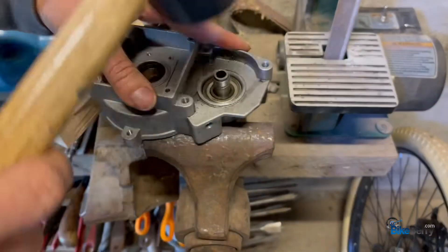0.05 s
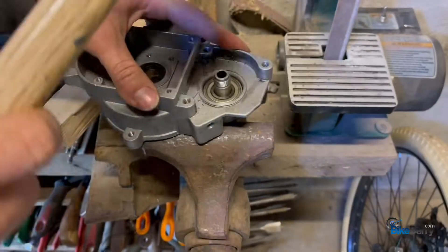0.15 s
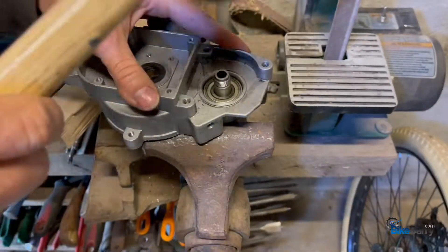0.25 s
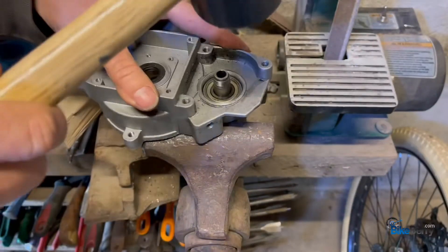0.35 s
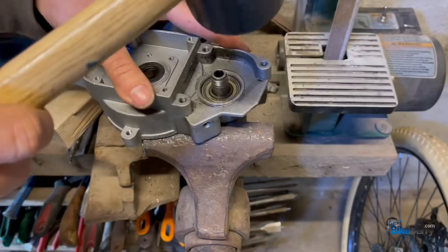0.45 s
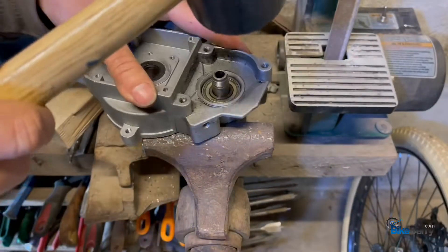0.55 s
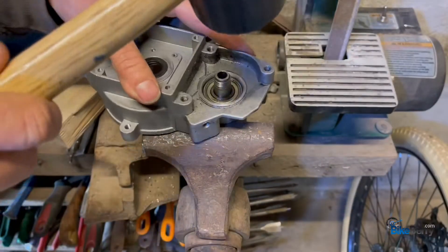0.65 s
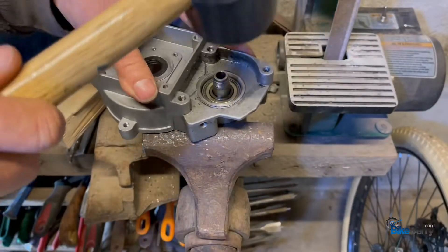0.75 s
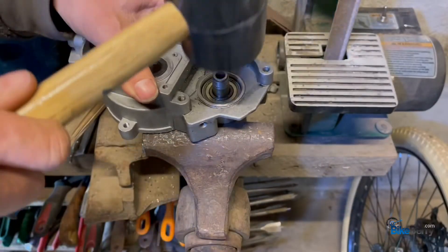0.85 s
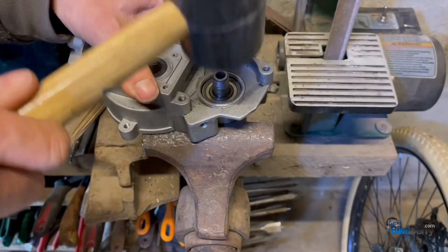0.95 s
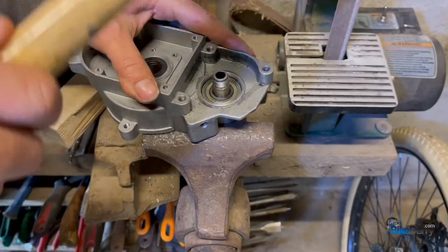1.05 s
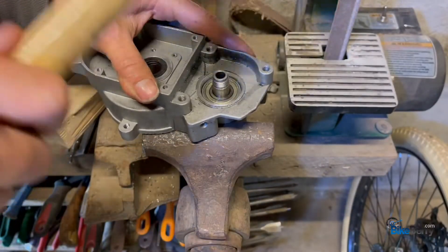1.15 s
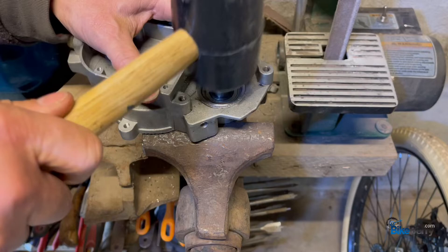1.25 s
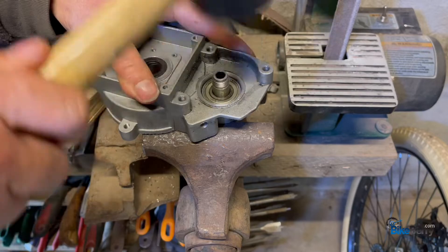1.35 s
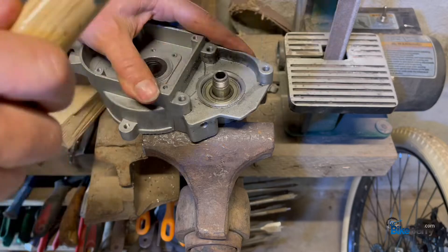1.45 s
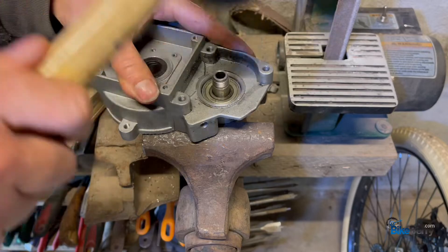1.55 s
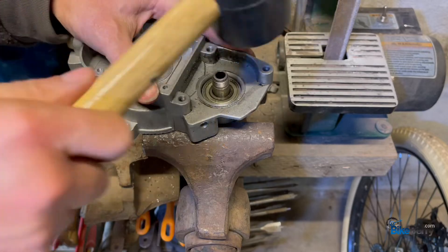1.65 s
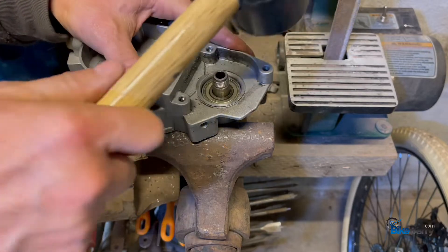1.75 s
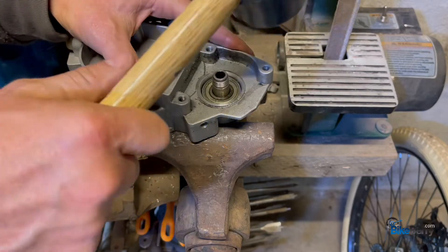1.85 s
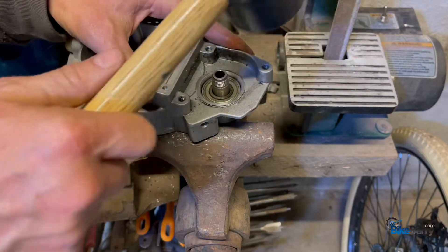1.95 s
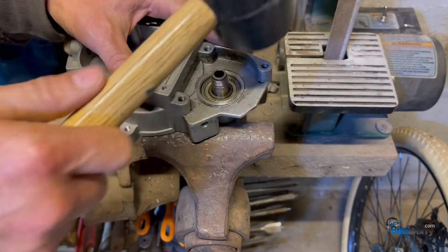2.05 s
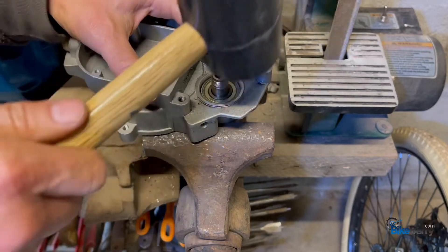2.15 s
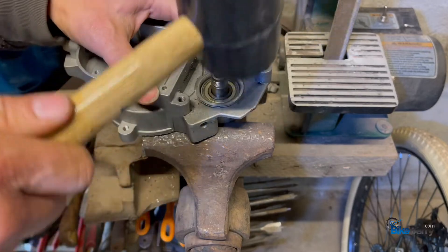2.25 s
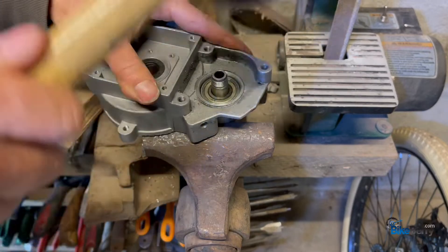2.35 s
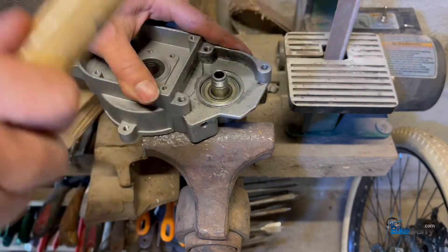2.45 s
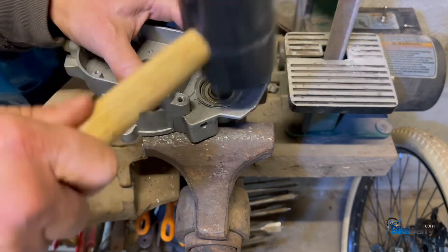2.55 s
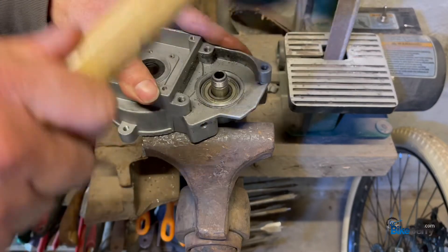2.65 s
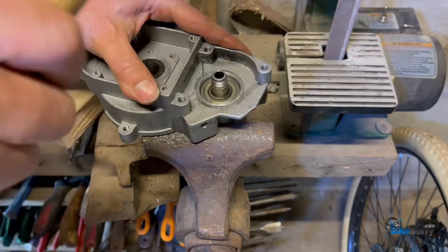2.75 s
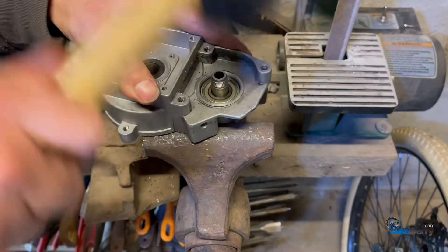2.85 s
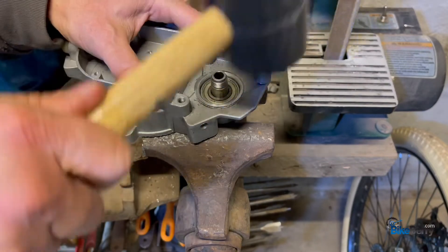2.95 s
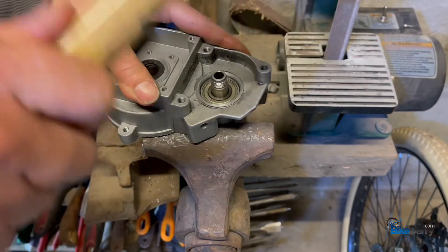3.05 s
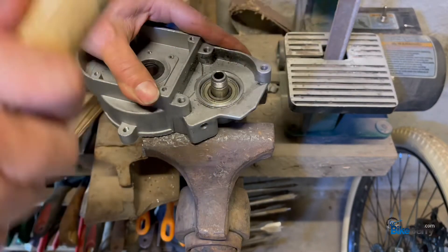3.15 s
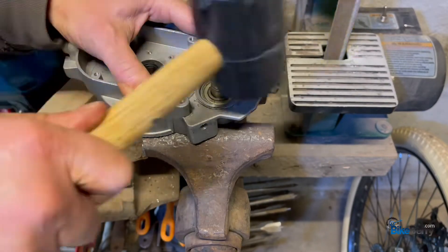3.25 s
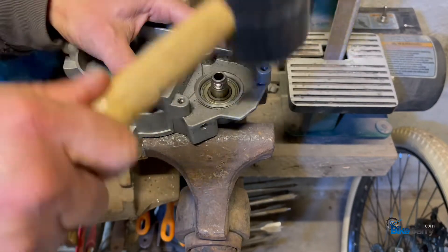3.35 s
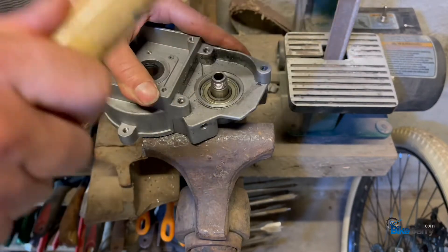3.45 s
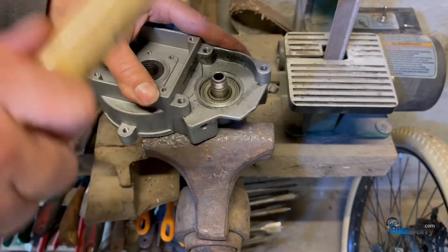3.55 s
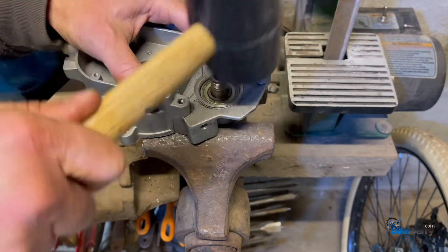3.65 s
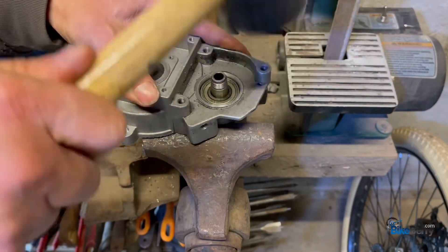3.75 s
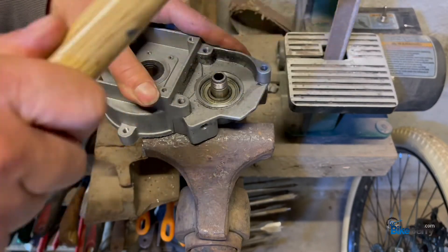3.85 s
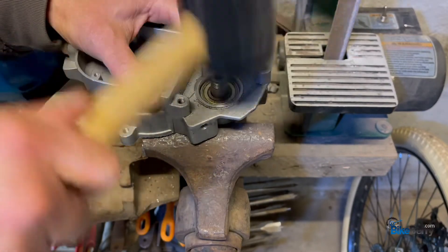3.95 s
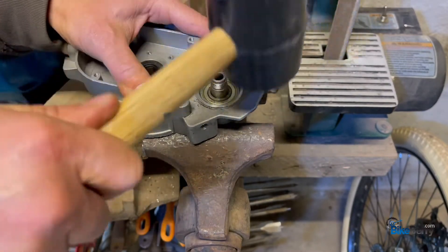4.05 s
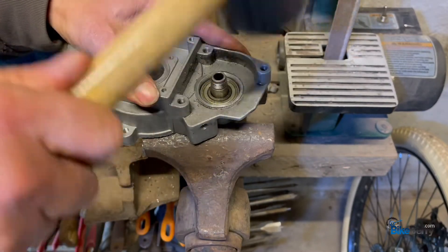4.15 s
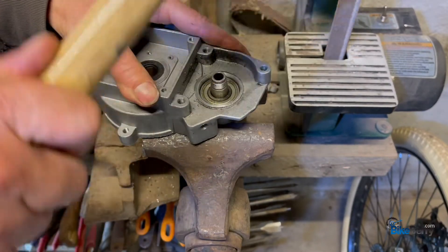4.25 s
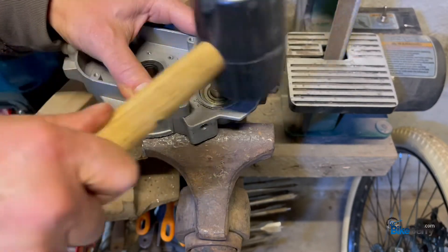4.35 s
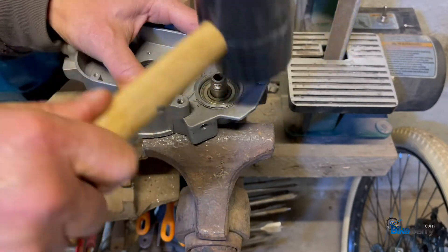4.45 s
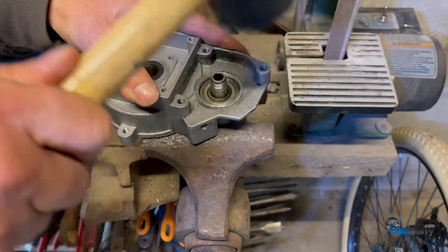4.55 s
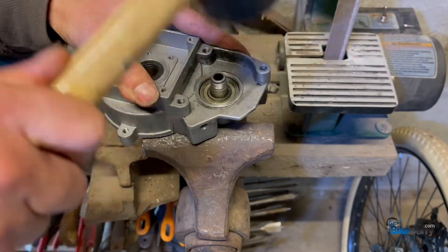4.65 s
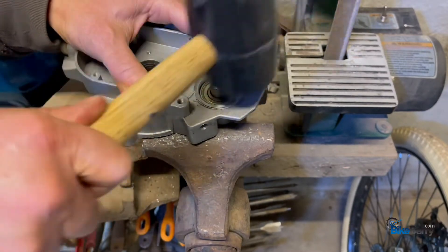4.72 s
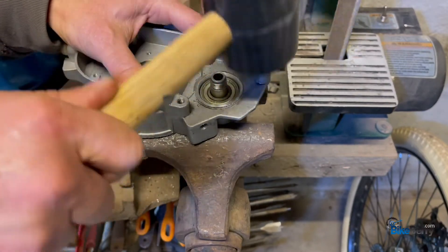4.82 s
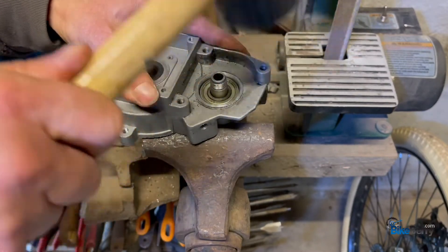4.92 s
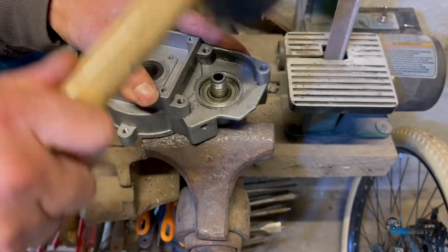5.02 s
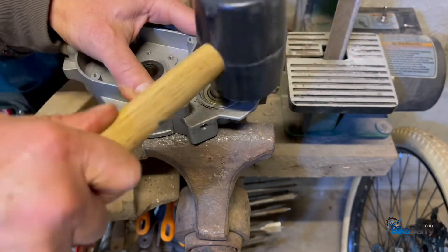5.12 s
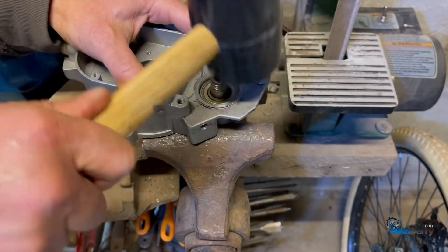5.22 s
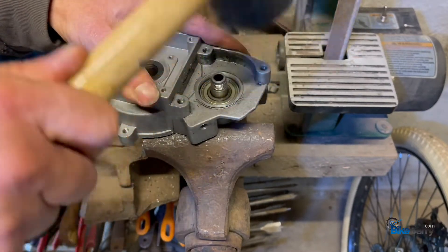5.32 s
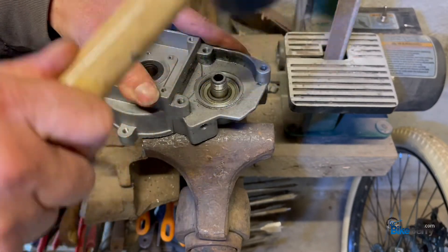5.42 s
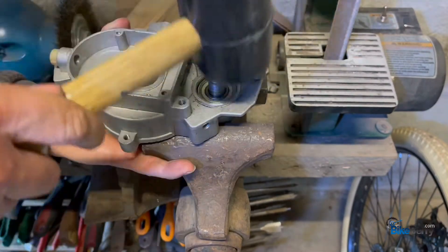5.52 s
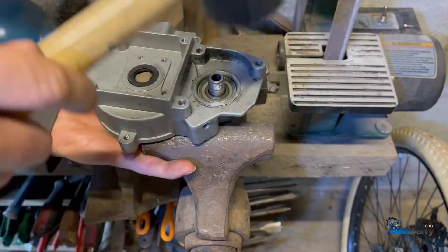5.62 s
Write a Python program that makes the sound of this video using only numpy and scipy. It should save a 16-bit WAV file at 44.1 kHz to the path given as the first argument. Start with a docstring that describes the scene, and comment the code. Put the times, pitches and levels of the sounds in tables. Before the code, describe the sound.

A rubber mallet strikes a metal engine case in a vise: handling scrape, one ringing blow, a pause, then eight quick heavy clanking knocks.

```python
"""A rubber mallet knocks a steel shaft in an aluminium engine case on a vise: one light blow, then a quick run.
Each blow sums decaying modes of case, shaft, bench and frame with a noisy crack, gritty clatter and room echo.
Light taps and a short rocking of the case use the same mechanism with other settings.
The case scrapes over the vise as smooth coloured noise; skin and cloth rustle in grainy swells.
Behind it lies the workshop: unsteady low hum tones and coloured noise for the air."""
import sys
import numpy as np
from scipy import signal
from scipy.fft import rfft, irfft, next_fast_len
from scipy.io import wavfile
from scipy.ndimage import uniform_filter1d, map_coordinates

SR = 44100
rng = np.random.default_rng(int(sys.argv[2]) if len(sys.argv) > 2 else 0)


def output_pcm(signal):
    """Save a mono or channel-first signal as 16-bit PCM at the path in sys.argv[1].

    Samples are clipped to [-1, 1] before scaling.
    """
    pcm = np.clip(np.atleast_2d(signal).T, -1, 1) * 32767
    wavfile.write(sys.argv[1], SR, np.round(pcm).astype(np.int16))


def boost(x):
    """Linear amplitude factor 10**(x/20) for a level x in decibels (scalar or array-like)."""
    u = np.asarray(x, float) / 20
    return 10 ** u


N = 250488  # length in samples

# Mallet blows. Each row: start in seconds, case ring level in dB, bench weight in dB over the ring,
# metal crack in dB over the ring, best-excited pitch in Hz.
MALLET_BLOWS = [(1.226, -20.5, -17.5, -16, 1550), (2.526, -9.5, -14, -7.5, 1453),
                (2.879, -8.5, -10, -5.5, 1434), (3.219, -14, -10, 1, 1540), (3.616, -7, -13.5, -12.5, 1500),
                (3.961, -9.5, -9.5, -5, 1495), (4.317, -10, -16.5, -2.5, 935),
                (4.709, -8.5, -14, -8.5, 1595), (5.065, -10, -17, -0.5, 1495),
                (5.47, -17, -16, -12.5, 1030)]
# Light contacts of hand, case and mallet. Each row: start in seconds, case ring level in dB,
# bench weight in dB over the ring, metal crack in dB over the ring, best-excited pitch in Hz.
LIGHT_TAPS = [(.028, -47, 3, -31, 770), (.211, -64, -3.5, 20.5, 1170), (.226, -63.5, -4.5, 9, 1200),
              (.338, -34.5, -16, -9.5, 640), (.349, -43, -23.5, -1, 1210), (.563, -21.5, -19, -32, 1040),
              (.637, -42, -10, -11.5, 1450), (.925, -54, -0.5, -37, 1570), (2.0955, -29, -18.5, -27, 970),
              (2.218, -50.5, -3, -22, 1180), (2.316, -55, 2, -32, 990)]
# The loose case rocks on the vise jaws after the first blow. Each row: start in seconds, case ring level in dB,
# bench weight in dB over the ring, metal crack in dB over the ring, best-excited pitch in Hz.
JAW_ROCKING = [(1.242, -2.5, -26.5, -44.5, 1546), (1.262, -15, -22.5, -30.5, 1530),
               (1.283, -24, -10.5, -35.5, 1530)]

# Modes of the case. Each row: pitch in Hz, relative level in dB, t60 in seconds at damping 1.
CASE_MODES = [(674, -13, 0.12), (762, -13.5, 0.015), (920, -2, 0.044), (1030, -5, 0.041), (1249, -5, 0.054),
              (1495, -7, 0.013), (1543, 1.5, 0.049), (1620, -11, 0.08), (1753, -9.5, 0.013),
              (2000, 0.5, 0.018), (2330, -3, 0.073), (2500, -10, 0.072)]
# Modes of shaft and ribs. Each row: pitch in Hz, relative level in dB, t60 in seconds at damping 1.
SHAFT_MODES = [(2784, 2, .04), (3058, -3.5, 0.047), (3410, 0.5, 0.02), (3940, -8, 0.044),
               (4143, -4.5, 0.066), (4384, -6.5, 0.084), (5600, -14, 0.036), (5560, -10.5, 0.033),
               (6670, -11.5, 0.081), (8280, -1.5, 0.055), (8760, -5, 0.043), (9350, -9, 0.21),
               (10100, -9, 0.04)]
# Modes of vise and bench top. Each row: pitch in Hz, relative level in dB, t60 in seconds at damping 1.
BENCH_MODES = [(233.5, -3, 0.17), (246, -0.5, 0.14), (308, -6.5, 0.098), (374, -5.5, 0.04),
               (415.6, -8.5, 0.25), (468, 2, 0.12), (541, -4.5, 0.15)]
# Modes of bench frame and floor. Each row: pitch in Hz, relative level in dB, t60 in seconds at damping 1.
FRAME_MODES = [(70, 0, 0.057), (89, 0, 0.072), (122, -1, 0.29), (168.4, -2, 0.7)]

# Colour of the dense clatter on the bench. Each row: frequency in Hz, relative density in dB per Hz.
CLATTER_COLOUR = [(35, -37.5), (60, -1), (253, -1), (563, -4.5), (735, -10.5), (938, -6), (1300, -10),
                  (1580, -2.5), (2130, -7), (4330, -18.5), (5050, -18.5), (8420, -16.5), (12000, -43.5),
                  (15600, -65), (22000, -120)]
# Decay of that clatter. Each row: frequency in Hz, t60 in seconds.
CLATTER_DECAY = [(100, 0.14), (400, 0.18), (1500, 0.092), (4000, 0.12), (10000, 0.022)]
# The clatter leans towards the best-excited pitch: lift in dB, width in octaves.
LEAN_DB, LEAN_OCTAVES = 4, 0.27
# Workshop reverberation. Each row: frequency in Hz, t60 in seconds.
SHOP_DECAY = [(100, 0.65), (400, 0.4), (1500, 0.29), (3000, 0.29), (5500, 0.26), (10000, 0.16)]

# The case slides across the vise under the hand. Each row: time in seconds,
# scrape level in dB ahead of a 3 dB cut, skin hiss level in dB.
SLIDE_LEVELS = [(0, -64.5, -73), (.11, -66, -66.5), (.2, -64, -53.5), (.34, -49, -45.5), (.404, -27, -33.5),
                (.484, -23.5, -31), (.556, -43, -62), (.608, -62.5, -63.5), (.8, -70.5, -92)]
# Colour of the scrape. Each row: frequency in Hz, relative level in dB.
SCRAPE_COLOUR = [(120, -38.5), (250, -11), (470, -1), (680, -12), (900, -4.5), (1080, -9.5), (1300, -3),
                 (1750, -12), (2150, -8.5), (3000, -12), (6000, -15.5), (8800, -15), (11400, -30.5),
                 (13000, -52)]
# Short rustles of skin and cloth. Each row: peak time in seconds, half length in seconds, level in dB.
RUSTLE_SWELLS = [(0.708, 0.028, -69), (1.077, 0.041, -74.5), (1.202, 0.023, -76), (1.653, 0.039, -63),
                 (1.774, 0.051, -69.5), (2.054, 0.058, -68), (2.135, 0.02, -80), (2.392, 0.038, -76)]
# Colour of hiss and rustle. Each row: frequency in Hz, relative level in dB.
SKIN_COLOUR = [(1500, -30), (2500, -18.5), (4200, -13), (6000, -17), (8800, -5), (10000, -6), (12500, -26),
               (16000, -62)]
RUSTLE_BED_DB = -87

# Background levels, with a brief dip ahead of the run. Each row: time in seconds, hum level in dB, air level in dB.
BACKGROUND_LEVELS = [(0, -55, -58.5), (.7, -56.5, -62), (1.4, -55.5, -67.5), (2.4, -57, -60.5),
                     (2.48, -71, -66), (2.8, -60.5, -56.5), (4.9, -63, -65), (5.68, -66, -65)]
# Tones of the hum. Each row: pitch in Hz, level in dB relative to the hum.
HUM_TONES = [(55, 0.5), (110, -17.5), (360, -22.5)]
# Colour of the air. Each row: frequency in Hz, relative density in dB per Hz.
AIR_COLOUR = [(20, -16), (55, 0), (90, -9), (200, -15), (500, -22), (1200, -27), (2500, -33), (4000, -46),
              (10000, -58)]

# Level between the two microphone ports. Each row: frequency in Hz, left over right in dB ahead of the pan.
PORT_LEVEL = [(100, -3), (700, -0.5), (1300, 6), (2400, 2.8), (4400, 4.5), (6000, 2), (8000, -1.5),
              (11500, -3.5)]
# Phase between the ports. Each row: frequency in Hz, lead of the left in radians.
PORT_PHASE = [(100, .15), (1000, .25), (2200, .3), (2800, 1.3), (3900, 0), (5200, .8), (6400, .1),
              (7800, .3), (8500, -1), (9200, -2.4), (9800, -2.4), (10600, -.5), (11500, 0)]
# Diffuse sound at the ports. Each row: frequency in Hz, likeness of left and right (1 = identical).
PORT_LIKENESS = [(60, 1), (200, .88), (600, 0.17), (1500, 0.89), (6000, 0.45), (9000, 0.24)]
# Overall tone colour: full up to 9.7 kHz, very little treble above 10 kHz.
# Each row: frequency in Hz, gain in dB.
TONE_COLOUR = [(20, -8), (50, -2), (100, 3), (9700, 0), (10100, -12), (11500, -7.5), (12500, -30),
               (14000, -45), (16000, -38)]
FULL_SCALE = .95  # ceiling of the soft clipping


def unit(x):
    """Scale to rms 1."""
    return x / np.sqrt(np.mean(x ** 2) + 1e-20)


def along(points, hz):
    """Read (Hz, value) points on a log frequency axis."""
    f, v = np.transpose(points)
    return np.interp(np.log(hz + 1), np.log(f + 1), v)


def curves(rows):
    """One value per sample for each column after the time; -88 dB after the last row."""
    s, *columns = np.transpose(rows)
    return [np.interp(np.arange(N) / SR, s, column, right=-88) for column in columns]


def wobble(rate):
    """A smooth random curve with rate knots a second."""
    knots = rng.standard_normal(int(N * rate / SR) + 4)
    return map_coordinates(knots, [np.arange(N) * rate / SR])


def filtered(x, response):
    """Multiply the spectrum of x by a response of frequency, real or complex."""
    size = next_fast_len(x.shape[-1] + 4096)
    spectrum = rfft(x, size) * response(np.fft.rfftfreq(size, 1 / SR))
    return irfft(spectrum, size)[..., :x.shape[-1]]


def diffuse(pair, colour):
    """Colour two unrelated signals and mix them to the likeness of a diffuse field at the ports."""
    def mid_side(hz):
        turn = np.arccos(np.clip(along(PORT_LIKENESS, hz), -1, 1)) / 2
        return boost(along(colour, hz)) * [np.cos(turn), np.sin(turn)]

    mid, side = filtered(pair, mid_side)
    return np.array([mid + side, mid - side])


def ports(x, pan_db):
    """A near source reaches the two ports with its own level and phase."""
    def left_right(hz):
        level = boost((along(PORT_LEVEL, hz) + pan_db) / 2)
        half = level * np.exp(.5j * along(PORT_PHASE, hz))
        return np.array([half, 1 / half])

    return filtered(x, left_right)


def dying(t60s, size):
    """Two noises in which each frequency dies at its own speed."""
    hz, t, z = signal.stft(rng.standard_normal((2, size)), SR, nperseg=128)
    decay = boost(-60 * t / np.abs(along(t60s, hz))[:, None])
    return signal.istft(z * decay, SR, nperseg=128)[1][:, :size]


def add(out, s, x):
    """Mix x into out from second s."""
    part = out[:, round(s * SR):][:, :x.shape[1]]
    part += x[:, :part.shape[1]]


def ring(modes, t, rise_s, damping, scatter, rattle, tilt_db=0, luck_db=2.5):
    """Modes at new strengths, phases and pitches; loose contact shakes their phase, which smears the tones."""
    hz, db, t60 = np.transpose(modes)[:, :, None]
    luck = rng.standard_normal((len(modes), 3))
    steps = rng.standard_normal((len(modes), len(t)))
    shake = rattle * np.sqrt(hz / SR) * np.cumsum(steps, axis=1)
    pitch = hz * (1 + 0.01 * luck[:, :1])
    tones = np.sin(2 * np.pi * pitch * t + scatter * luck[:, 1:2] + shake)
    gains = boost(db + tilt_db + luck_db * luck[:, 2:] - 60 * t * damping / t60)
    return (gains * tones).sum(0) * (1 - np.exp(-t / rise_s)) ** 2


def metal_crack(t):
    """The crack at contact: bright noise with a t60 of 35 ms."""
    bright = filtered(rng.standard_normal(len(t)), lambda hz: hz / (hz + 2500))
    return boost(-60 * t / 0.035) * bright


def loose_clatter(t, spot_hz):
    """Loose parts jump all over the bench: two gritty noises that lean towards the struck pitch."""
    grit = boost(2.3 * unit(uniform_filter1d(rng.standard_normal(len(t)), 130)))
    grit = grit * (1 - np.exp(-t / 0.0029))

    def colour(hz):
        octaves = np.log2((hz + 1) / spot_hz)
        lean_db = LEAN_DB * np.exp(-(octaves / LEAN_OCTAVES) ** 2)
        return boost(along(CLATTER_COLOUR, hz) + lean_db)

    return grit * unit(filtered(dying(CLATTER_DECAY, len(t)), colour))


def room_echo(sound):
    """The workshop answers 250 samples later with a diffuse noise tail, a little stronger on the left."""
    tail = diffuse(dying(SHOP_DECAY, len(sound)), [(100, -3.5), (1000, -0.5), (8000, -1.0)])
    late = np.pad(sound, (250, 0))[None]
    echo = signal.fftconvolve(late, tail / np.linalg.norm(tail[0]), axes=1)
    return echo * boost([[1.2], [-1.2]])


def knocks(table, press_s, damping, scatter, crackle_db, room_db, thud_db, clatter_db, focus_db, pan_db,
           ring_room_db):
    """Metal cracks fast, the case swells over the rubber's press time, bench and loose parts join in."""
    out = np.zeros((2, N))
    t = np.arange(SR // 5 * 2) / SR
    for s, case_db, weight_db, sharp_db, spot_hz in table:
        thump_db, crack_db = case_db + weight_db, case_db + sharp_db
        # modes far from the pitch that the contact favours are struck less
        octaves = np.log2(np.transpose(CASE_MODES)[0, :, None] / spot_hz)
        tilt_db = -focus_db * octaves ** 2
        case = boost(case_db) * ring(CASE_MODES, t, press_s, damping, scatter, rattle=0.43, tilt_db=tilt_db)
        shaft = boost(crack_db) * ring(SHAFT_MODES, t, 0.00083, damping=1.63, scatter=2.8, rattle=.35)
        bench = boost(thump_db) * ring(BENCH_MODES, t, 0.0022, damping, scatter, rattle=0.19)
        thud = boost(thump_db + thud_db) * ring(FRAME_MODES, t, 0.00043, damping, scatter=0.35,
                                              rattle=0.049, luck_db=0.67)
        crack = boost(crack_db + crackle_db) * metal_crack(t)
        clatter = boost(case_db + clatter_db) * loose_clatter(t, spot_hz)

        rings, noises = case + shaft + bench, crack + clatter[0]
        near = ports(rings + noises + thud, pan_db)
        # the second clatter noise comes from the sides, in opposite phase left and right
        sides = filtered(clatter[1], lambda hz: hz / (hz + 250) * (hz < 7000))
        add(out, s - .0004, near + [[.7], [-.7]] * sides)
        # the rings beam towards the microphone; the room hears more of the noise
        add(out, s, boost(room_db) * room_echo(boost(ring_room_db) * rings + noises))
    return out


def blows():
    """Mallet blows: the rubber presses for milliseconds and wakes a broad range of case modes."""
    return knocks(MALLET_BLOWS, press_s=.0022, damping=1.397, scatter=1.2, crackle_db=-1.5, room_db=-7.5,
                  thud_db=-7.5, clatter_db=-24.5, focus_db=5.0, pan_db=2.5, ring_room_db=-7.5)


def rocking():
    """The case rocks on the jaws: heavily damped rings, tightly focused on one pitch."""
    return knocks(JAW_ROCKING, press_s=0.0023, damping=2.2, scatter=.15, crackle_db=-9.5, room_db=-5,
                  thud_db=-16, clatter_db=-45, focus_db=46, pan_db=3.5, ring_room_db=-8)


def taps():
    """Light contacts: a quicker rise and stronger damping make short, dry knocks."""
    return knocks(LIGHT_TAPS, press_s=0.00068, damping=2.6, scatter=0.18, crackle_db=-6, room_db=-5.5,
                  thud_db=-6, clatter_db=-40.5, focus_db=22.5, pan_db=1.0, ring_room_db=-5)


def friction(colour, rough_db):
    """Friction noise: near-field rasp, with fast uneven grain if rough_db is above 0, plus a diffuse share."""
    grain = boost(rough_db * unit(uniform_filter1d(rng.standard_normal(N), 40)))
    rasp = unit(filtered(grain * rng.standard_normal(N), lambda hz: boost(along(colour, hz))))
    around = unit(diffuse(rng.standard_normal((2, N)), colour))
    return unit(ports(rasp, 2.6) + 0.7 * around)


def handling():
    """The case scrapes over the vise as smooth coloured noise; skin and cloth rustle in grainy swells."""
    scrape_db, hiss_db = curves(SLIDE_LEVELS)
    t = np.arange(N) / SR
    slide = boost(scrape_db - 3 + 0.48 * wobble(40)) * friction(SCRAPE_COLOUR, rough_db=0.0)
    swells = sum(boost(db) * np.exp(-((t - s) / half) ** 2) for s, half, db in RUSTLE_SWELLS)
    rustle = (boost(hiss_db) + swells + boost(RUSTLE_BED_DB)) * boost(1.1 * wobble(9.9))
    return slide + rustle * friction(SKIN_COLOUR, rough_db=4.0)


def ambience():
    """A machine hum of low tones wavering in level and phase, and the diffuse air of the room."""
    hum_db, air_db = curves(BACKGROUND_LEVELS)
    t = np.arange(N) / SR
    hum = 0
    for hz, db in HUM_TONES:
        level = boost(db + 2.5 * wobble(22))
        hum = hum + level * np.sin(2 * np.pi * hz * t + 0.42 * wobble(10.0))
    air = boost(air_db + 0.76 * wobble(12)) * unit(diffuse(rng.standard_normal((2, N)), AIR_COLOUR))
    return boost(hum_db) * hum * boost([[.8], [-.8]]) + air


def scene():
    """Blows, rocking, taps, handling and background together."""
    return blows() + rocking() + taps() + handling() + ambience()


def low_pass(x):
    """Removes everything above the highest recorded frequency."""
    return signal.sosfilt(signal.butter(12, 16630, fs=SR, output="sos"), x)


def record(dry):
    """Overall tone colour, then soft clipping of the highest peaks."""
    heard = filtered(dry, lambda hz: boost(along(TONE_COLOUR, hz)))
    clipped = heard / (1 + np.abs(heard / FULL_SCALE) ** 6) ** (1 / 6)
    return low_pass(clipped)


dry = scene()
out = record(dry)
output_pcm(out)
```